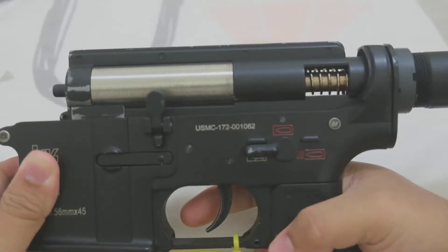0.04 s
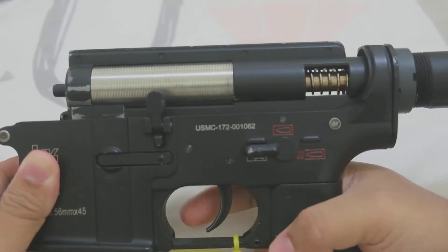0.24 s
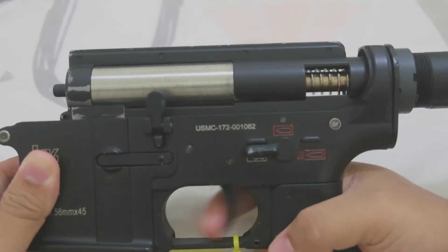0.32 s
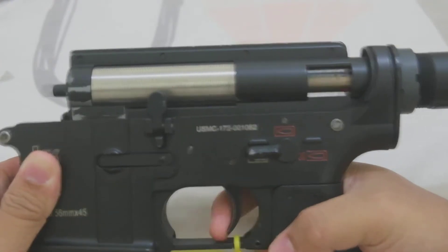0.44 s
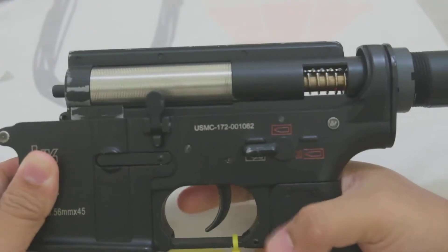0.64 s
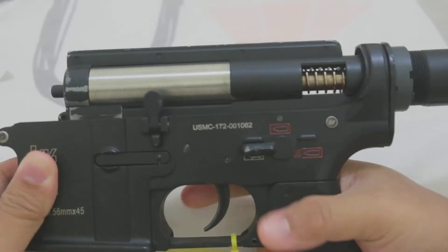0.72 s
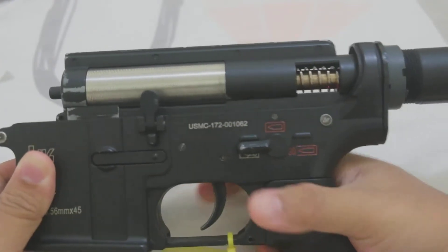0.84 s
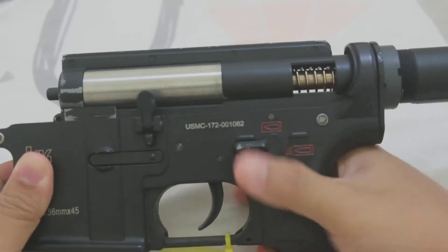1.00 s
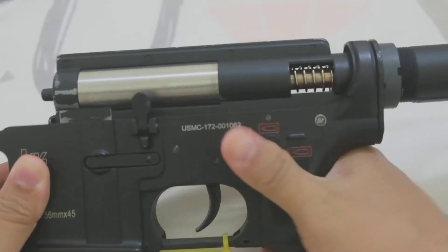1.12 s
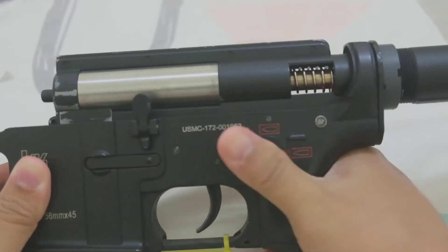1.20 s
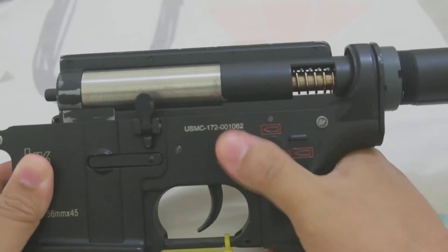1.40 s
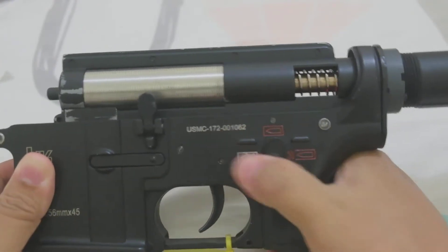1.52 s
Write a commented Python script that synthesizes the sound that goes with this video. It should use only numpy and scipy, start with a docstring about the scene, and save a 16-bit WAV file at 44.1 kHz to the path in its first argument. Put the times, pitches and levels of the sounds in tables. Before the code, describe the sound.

Close rattling burst of four hard mechanical slams from a toy rifle, then small selector snaps

```python
"""Toy rifle burst in a small room

An electric toy rifle fires one burst of four shots, close by in stereo. Gear teeth rattle the metal
shell while the spring is wound: dense noise grains through the shell's colour and modes. The piston
slams home and bounces as ringing blows with noisy cracks, the frame knocks, and the gears coast to rest.
Small snaps and rubbing noise are parts and the thumb on the selector lever. Low rumble, a short
room echo and steady room tone lie beneath."""
import sys
import numpy as np
from scipy import signal
from scipy.fft import rfft, irfft
from scipy.io import wavfile
from scipy.ndimage import uniform_filter1d

SR = 44100
rng = np.random.default_rng(int(sys.argv[2]) if len(sys.argv) > 2 else 0)


def put_to_file(sound):
    """Save the sound as 16-bit audio at rate SR, in the file named by the first command-line argument."""
    columns = np.atleast_2d(sound).T  # one column per channel
    safe = np.clip(columns, -1, 1)
    whole_steps = np.round(safe * 32767)
    wavfile.write(sys.argv[1], SR, whole_steps.astype(np.int16))


N = 68355  # length in samples

# Room tone spectrum: hz, level_db (relative)
AIR_COLOUR = [(20, -30), (60, 1.5), (100, -3), (252, -3), (440, -6), (632, -7.5), (835, -11.5), (1300, -12),
              (2610, -17), (3760, -19), (15500, -38.5)]
# Left-right likeness of the room tone: hz, likeness (-1 to 1)
AIR_LIKENESS = [(60, 0.59), (240, 0.26), (950, 0.19), (3770, -0.12), (15000, 0.4)]
# Low rumble in the hands while the motor turns: start_s, level_db
RUMBLE_LEVEL = [(.22, -62), (.4, -50.5), (.54, -49.5), (.66, -49), (.74, -65)]
# Room echo decay: hz, t60_s
ROOM_DECAY = [(200, 0.12), (1000, 0.45), (4000, 0.42), (12000, 0.35)]
# Left-right likeness of the gun: hz, likeness (0 to 1)
GUN_LIKENESS = [(60, 0.49), (180, 0.96), (550, 0.93), (1300, 0.89), (2300, 0.59), (4970, 0.45),
                (15000, 0.035)]
# Stereo balance of the gun: hz, left_minus_right_db
GUN_BALANCE = [(60, -2), (180, 2.5), (550, 1), (1650, -0.5), (4970, 1.5), (15000, 0.5)]
# Small clicks of lever and parts: start_s, level_db, brightness_db_per_octave, extra_top_db
CLICKS = [(.5505, -19, 16, -2), (0.787, -27, 0, -13), (1.263, -11, 0.5, -29), (1.274, -29, 9, -10),
          (1.3103, -31, -10, 0), (1.315, -33, -11, 0), (1.4218, -29, -21, 0), (1.428, -19, 11, 7),
          (1.4297, -13, 2.5, 15), (1.4325, -18.5, 8, 0), (1.4336, -24, -6.5, -9), (1.44, -24, 17, -6),
          (1.496, -24, -10.5, -21), (1.501, -35, -27, -10)]
# Lever modes: hz, level_db (relative), t60_s
LEVER_MODES = [(1660, -10, .01), (1870, -4, .014), (2490, 0, .011), (2800, -14, .008), (4050, -7, .007),
               (5240, -19, .02), (5730, -17, .02), (7000, -17, .008), (9120, -27, .025), (11100, -24, .007)]
# Noise spectrum of a snap before brightness: hz, level_db (relative, per Hz)
SNAP_COLOUR = [(1300, -31.5), (1670, -2.5), (2550, -9.5), (3340, -13.5), (4600, -14.5), (5600, -8.5),
               (9060, -18), (9940, -36), (13400, -29), (15500, -64)]
# Thumb sliding on the shell: start_s, level_db
RUSTLE_LEVEL = [(1.265, -38), (1.275, -48.5), (1.33, -57.5), (1.4, -52), (1.43, -51.5), (1.436, -38),
                (1.49, -52), (1.55, -62)]
# Noise spectrum of that rubbing: hz, level_db (relative, per Hz)
RUB_COLOUR = [(1200, -26), (1750, -2), (1860, 6), (3390, -12), (6520, -1), (15500, -21)]
# Low modes of the whole frame: hz, level_db (relative), t60_s
FRAME_MODES = [(179, -4, 0.152), (260, 1, 0.082), (291, 6.5, 0.031)]
# Gear train over time: start_s, level_db, low_band_share (share of the fuller colour, 0 to 1)
GEAR_TRAIN = [(0.211, -78, 0.1), (0.2145, -16.5, 0.9), (0.217, -14, 0.01), (0.264, -15, 0),
              (0.299, -13, 0.99), (.43, -14.5, 0.63), (0.459, -13.5, 1), (.49, -21.5, 1), (.52, -25.5, 1),
              (.575, -23, 1), (.625, -23.5, 1), (.66, -29, 1), (.7, -31.5, 1), (.75, -41, 1), (.87, -49, 1),
              (0.961, -58.5, 1)]
# Brighter gear colour, heard before the first slam: hz, level_db (relative, per Hz)
BRIGHT_GEAR_COLOUR = [(88, -51), (150, -28), (404, -23), (562, -26), (913, -11), (1090, -17.5),
                      (1630, -4.5), (3160, -2), (4400, -1.5), (6740, -14.5), (9940, -13), (15500, -30)]
# Fuller, lower gear colour, heard mostly after the first slam: hz, level_db (relative, per Hz)
FULL_GEAR_COLOUR = [(88, -63.5), (150, -37), (480, -21.5), (643, -14.5), (723, -10.5), (930, -4.5),
                    (1200, -6.5), (2810, -9.5), (11000, -21), (13600, -35.5), (15500, -38)]
# Shell modes: hz, level_db (relative), t60_s
SHELL_MODES = [(700, -11, .035), (800, -5, .04), (922, 3, .06), (1080, 0, .08), (1340, -2, .05),
               (1600, -3, .05), (1770, -2, .05), (2250, -4, .04), (3110, -2, .04), (3460, -8, .03),
               (4550, -1, .045), (6400, -14, .02), (9000, -10, .03)]
# Piston hits home: start_s, level_db (relative)
SLAMS = [(0.271, 1), (0.3286, 2), (0.3847, 2.5), (0.442, 2.5)]
# Hits within each slam: delay_s, level_db (relative to the slam)
BOUNCES = [(0, 4.5), (.0055, 1.5), (.011, -5.5), (.028, -14)]
# Noise spectrum of a slam's crack: hz, level_db (relative, per Hz)
CRACK_COLOUR = [(350, -34.5), (600, -8.5), (966, 0.5), (2470, 2.5), (4150, -6), (4500, 1.5), (5670, -9),
                (9010, -8), (15500, -18)]

AIR_DB = -47
RUMBLE_HZ, RUMBLE_WIDTH_HZ = 73.6, 42
GUN_ECHO_DB, CLICK_ECHO_DB = -8.5, -13.5
GUN_SMEAR_S, CLICK_SMEAR_S = 0.0042, .0006  # rms delay of the opposite-sign stereo part
CLICK_DB, SNAP_DB, SCRAPE_DB = 1, -8.5, -6  # all clicks; noise in a click; rubbing that rings modes
SNAP_RISE_S, SNAP_T60_S = 0.00045, .009
TOP_HZ, LEVER_LOW_CUT_HZ = 12300, 1550  # a click's extra top begins; high-pass
START_S, START_DB = .213, -6.5  # the motor start jolts the frame too
THUD_DB, THUD_RISE_S = -20.5, 0.0019
TEETH_PER_S, TEETH_WANDER, TOOTH_DEPTH = 180, 0.238, 0.089  # mean rate; rms share; level swing
GRAINS_PER_S, GRAIN_SPREAD_DB = 9000, 1
GEAR_RING_DB, GEAR_LOW_CUT_HZ = -9, 240
SLAM_DB, CRACK_DB = -7, -6  # all slams; crack relative to body
SLAM_RISE_S, CRACK_T60_S = 0.00089, 0.027
CEILING, EDGE_HZ = 1.0, 15690  # clip level; upper band edge


def amp(db):
    """Turns dB into gain."""
    return 10 ** (np.asarray(db) / 20)


def evened(x):
    """Scales to rms 1."""
    return x / np.sqrt(np.mean(x ** 2) + 1e-20)


def unit_energy(x):
    """Scales a filter to unit energy, so white noise keeps its level."""
    return x / np.linalg.norm(x)


def read(points, hz):
    """Reads a table on a log-frequency axis."""
    f, value = np.transpose(points)
    return np.interp(np.log(hz + 1), np.log(f + 1), value)


def add(mix, start_s, sound):
    """Mixes a sound in at its start time."""
    part = mix[round(start_s * SR):][:len(sound)]
    part += sound[:len(part)]


def high(x, hz):
    """Steep high-pass."""
    return signal.sosfilt(signal.butter(4, hz, "high", fs=SR, output="sos"), x)


def colour(x, table):
    """Minimum-phase filter with the table's spectrum: no sound ahead of the blow."""
    hz = abs(np.fft.fftfreq(4096, 1 / SR))
    log_gain = np.log(amp(np.maximum(read(table, hz), -90)))
    response = np.exp(np.conj(signal.hilbert(log_gain)))
    taps = np.fft.ifft(response).real[:2048]
    return signal.oaconvolve(x, unit_energy(taps))[:len(x)]


def ring(modes, detune, vary_db):
    """One blow on a set of modes: decaying sines, each slightly varied in pitch and level; peak 1."""
    t = np.arange(5000) / SR
    draws = rng.uniform(-1, 1, (len(modes), 2))
    x = np.zeros(len(t))
    for (hz, db, t60), (pitch_draw, level_draw) in zip(modes, draws):
        decay = amp(db + vary_db * level_draw - 60 * t / t60)
        x += decay * np.sin(2 * np.pi * hz * (1 + detune * pitch_draw) * t)
    return x / abs(x).max()


def air():
    """Room tone: random short-time spectra with faint, slowly changing patches of level."""
    frames, hz = N // 256 + 5, np.fft.rfftfreq(1024, 1 / SR)
    a, b, c, d, patches = rng.standard_normal((frames, 513, 5)).T
    patches = uniform_filter1d(patches, 12, 0)  # across frequency
    patches = evened(uniform_filter1d(patches, 14, 1))  # across time
    same = np.clip(read(AIR_LIKENESS, hz), -1, 1)[:, None]
    left = a + 1j * b
    right = same * left + np.sqrt(1 - same ** 2) * (c + 1j * d)
    spectra = np.array([left, right]) * amp(read(AIR_COLOUR, hz)[:, None] + 1.2 * patches)
    tone = signal.istft(spectra, nperseg=1024, noverlap=768)[1][:, :N]
    return amp(AIR_DB) * evened(tone)


def rumble():
    """Motor rumble: a narrow band of low noise, partly different at each microphone."""
    hz, (s, db) = np.fft.rfftfreq(N, 1 / SR), np.transpose(RUMBLE_LEVEL)
    shared, split = rng.standard_normal((2, N))
    noise = rfft([shared + .5 * split, shared - .5 * split])
    band = irfft(noise * np.exp(-((hz - RUMBLE_HZ) / RUMBLE_WIDTH_HZ) ** 2), N)
    return evened(band) * amp(np.interp(np.arange(N) / SR, s, db, -120, -120))


def room(x):
    """Echo of sparse random-sign taps, each band dying at its own speed, other taps per side."""
    taps = np.zeros((2, SR // 2))
    slots = np.arange(160, SR // 2 - 20, 20)
    at = slots + rng.integers(0, 20, (2, len(slots)))  # one tap somewhere in each slot
    np.put_along_axis(taps, at, rng.choice([-1., 1.], at.shape), 1)
    hz, t, spectra = signal.stft(taps, SR, nperseg=256)
    decay = amp(-60 * t / read(ROOM_DECAY, hz)[:, None])
    tail = signal.istft(spectra * decay, SR, nperseg=256)[1]
    return signal.fftconvolve(x[None], tail / np.linalg.norm(tail[0]), axes=1)[:, :N]


def ports(x, far, smear_s):
    """Two microphones hear different patches of the shell: a shared part plus a smeared opposite-sign one."""
    hz = np.fft.rfftfreq(N, 1 / SR)
    same = np.clip(read(GUN_LIKENESS, hz), 0, 1)
    wander = evened(uniform_filter1d(rng.standard_normal(len(hz)), 60))
    delay_s = smear_s * abs(wander)  # one delay per frequency
    smeared = rfft(far) * np.exp(-2j * np.pi * np.cumsum(delay_s) * hz[1])
    mid = np.sqrt((1 + same) / 2) * rfft(x)
    side = np.sqrt((1 - same) / 2) * smeared
    tilt = amp(read(GUN_BALANCE, hz) / 2)
    return irfft(np.array([(mid + side) * tilt, (mid - side) / tilt]), N)


def rustle():
    """Thumb rubbing the shell: uneven noise grit, coloured and also ringing the lever modes."""
    s, db = np.transpose(RUSTLE_LEVEL)
    size = amp(1.1 * np.minimum(rng.exponential(1, N), 4))
    grit = evened(rng.standard_normal(N) * size)
    grit = grit * amp(np.interp(np.arange(N) / SR, s, db, -120))
    modes = np.diff(ring(LEVER_MODES, 0, 0))  # light rubbing favours the top modes
    rung = signal.oaconvolve(grit, unit_energy(modes))[:N]
    return colour(grit, RUB_COLOUR) + amp(SCRAPE_DB) * rung


def lever():
    """Thin snaps, each a noise burst with a few short modes, plus the rustle of the thumb."""
    out, t = np.zeros(N), np.arange(1500) / SR
    for s, db, bright_db, top_db in CLICKS:
        tilted = [(hz, level + bright_db * np.log2(hz / 2000) + top_db * (hz > TOP_HZ))
                  for hz, level in SNAP_COLOUR]
        snap = colour(rng.standard_normal(len(t)) * amp(-60 * t / SNAP_T60_S), tilted)
        modes = [(hz, level + bright_db * np.log2(hz / 2000), t60) for hz, level, t60 in LEVER_MODES]
        click = ring(modes, .006, 1.5)[:len(t)]
        click = click + amp(SNAP_DB) * snap / abs(snap).max()
        add(out, s, amp(db + CLICK_DB) * click * np.minimum(t / SNAP_RISE_S, 1))
    return high(out + rustle(), LEVER_LOW_CUT_HZ)


def thuds():
    """The whole frame knocks on its low modes at the motor start and at each slam."""
    out = np.zeros(N)
    for s, db in [(START_S, START_DB)] + list(SLAMS):
        thud = ring(FRAME_MODES, 0.007, 0.72)
        rise = np.minimum(np.arange(len(thud)) / SR / THUD_RISE_S, 1)
        add(out, s, amp(db + THUD_DB) * thud * rise)
    return high(out, 124)


def gears():
    """Dense random clicks, their level swinging with each tooth contact, colour and ring the shell."""
    t, (s, db, low_share) = np.arange(N) / SR, np.transpose(GEAR_TRAIN)
    low_share = np.clip(np.interp(t, s, low_share), 0, 1)
    wander = evened(uniform_filter1d(rng.standard_normal(N), 900))
    tooth = np.cos(2 * np.pi * np.cumsum(TEETH_PER_S * (1 + TEETH_WANDER * wander)) / SR)
    size = amp(GRAIN_SPREAD_DB * np.minimum(rng.exponential(1, N), 5)) * rng.choice([-1., 1.], N)
    struck = rng.random(N) < GRAINS_PER_S / SR
    clicks = evened(size * struck * (1 + TOOTH_DEPTH * tooth))
    clicks = clicks * amp(np.interp(t, s, db, -120, -120))
    modes = ring(SHELL_MODES, 0.0038, 1.4)
    bright, full = clicks * np.sqrt(1 - low_share), clicks * np.sqrt(low_share)
    rung = amp(GEAR_RING_DB) * signal.oaconvolve(full, unit_energy(modes))[:N]
    rattle = colour(bright, BRIGHT_GEAR_COLOUR) + colour(full, FULL_GEAR_COLOUR) + rung
    return high(rattle, GEAR_LOW_CUT_HZ)


def piston():
    """Each slam and its bounces: a blow on the shell modes and a noisy crack, both swelling quickly."""
    out, t = np.zeros(N), np.arange(3000) / SR
    rise = 1 - np.exp(-t / SLAM_RISE_S)
    for s, db in SLAMS:
        for delay_s, bounce_db in BOUNCES:
            body = rise * ring(SHELL_MODES, .005, 2.5)[:len(t)]
            burst = rng.standard_normal(len(t)) * rise * amp(-60 * t / CRACK_T60_S)
            crack = colour(burst, CRACK_COLOUR)
            at = s + delay_s * rng.uniform(.98, 1.02)
            add(out, at, amp(db + bounce_db + SLAM_DB) * (body + amp(CRACK_DB) * crack))
    return high(out, 610)


def scene():
    """Gun and lever in stereo, their room echo, the rumble and the room tone."""
    near, far = gears(), gears()  # two random draws of the gear noise, one for each stereo part
    slams, thumb, knocks = piston(), lever(), thuds()
    echo = room(amp(GUN_ECHO_DB) * (near + slams) + amp(CLICK_ECHO_DB) * thumb)
    gun = ports(near + slams + knocks, far + slams + knocks, GUN_SMEAR_S)
    clicks = ports(thumb, thumb, CLICK_SMEAR_S)
    return gun + clicks + echo + rumble() + air()


def record(dry):
    """Clips peaks above the ceiling, then cuts everything above the band edge."""
    held = np.clip(dry, -CEILING, CEILING)
    low_pass = signal.firwin(1023, EDGE_HZ, window=("kaiser", 9), fs=SR)
    return signal.oaconvolve(held, low_pass[None], "same")


dry = scene()
out = record(dry)
put_to_file(out)
```